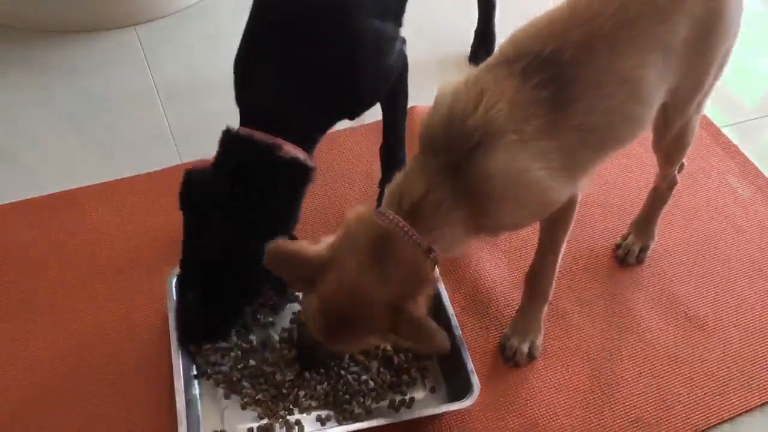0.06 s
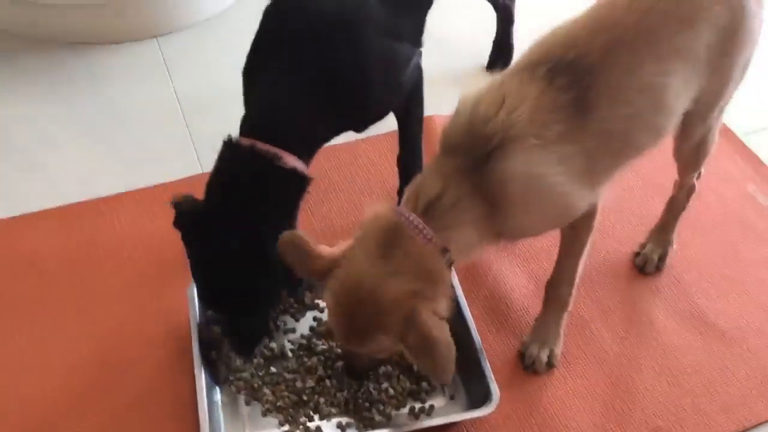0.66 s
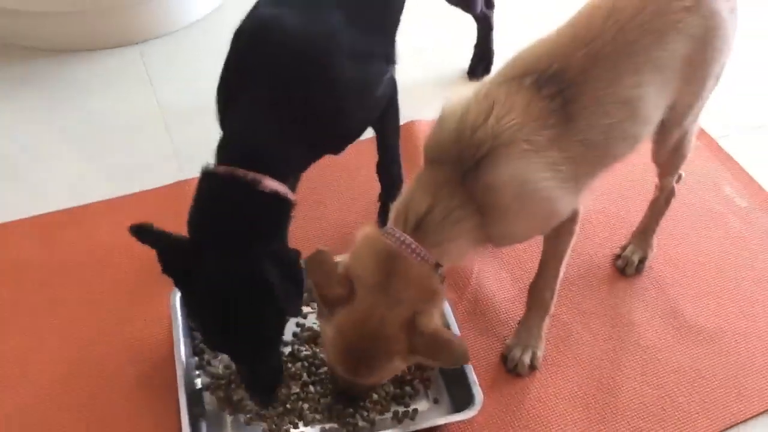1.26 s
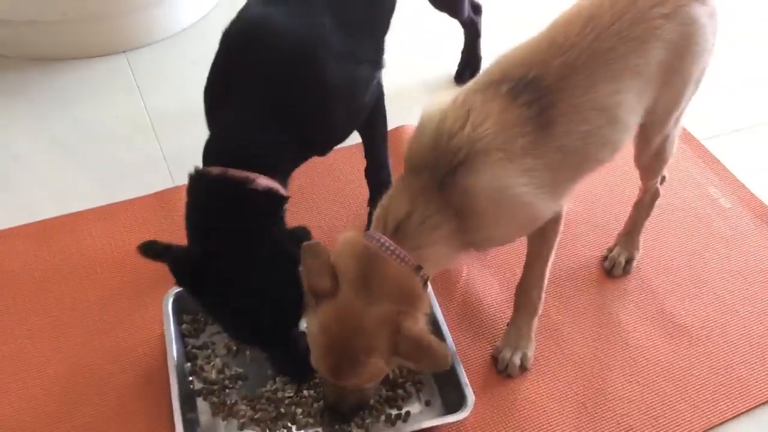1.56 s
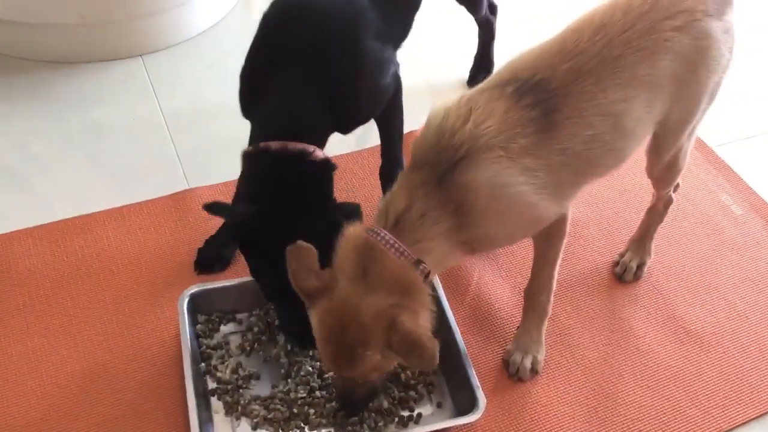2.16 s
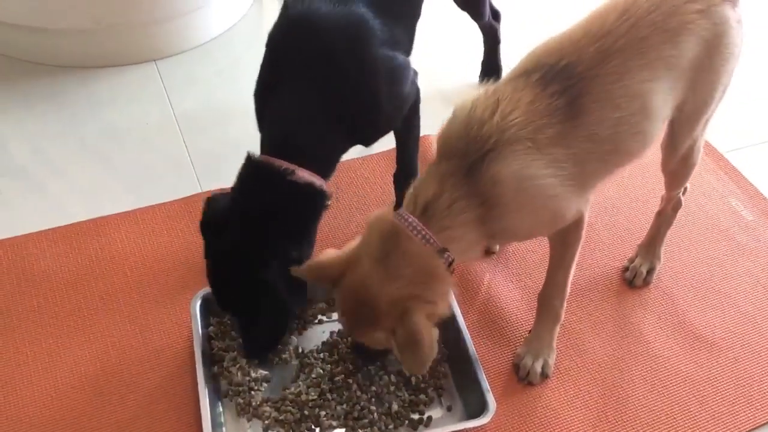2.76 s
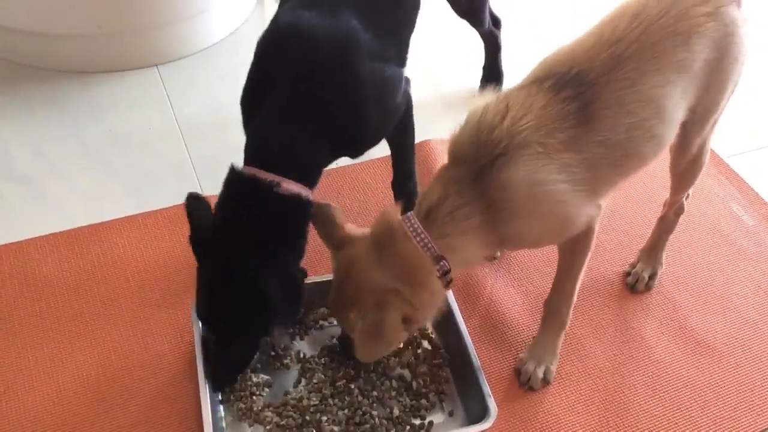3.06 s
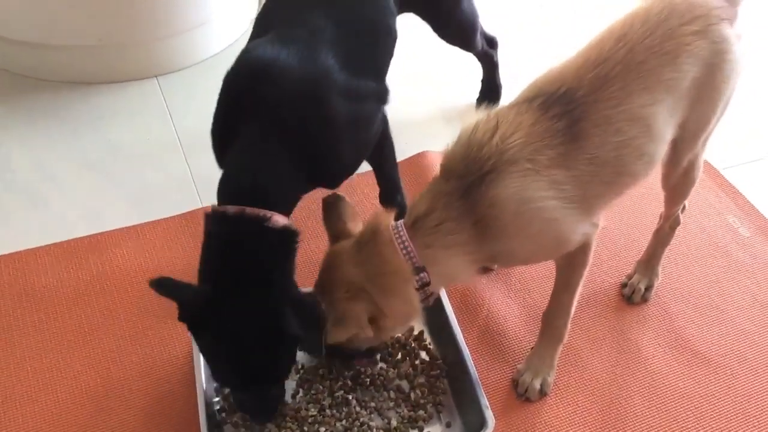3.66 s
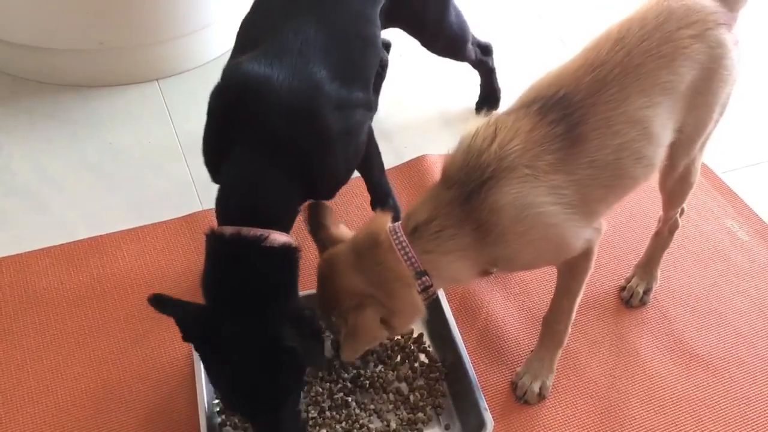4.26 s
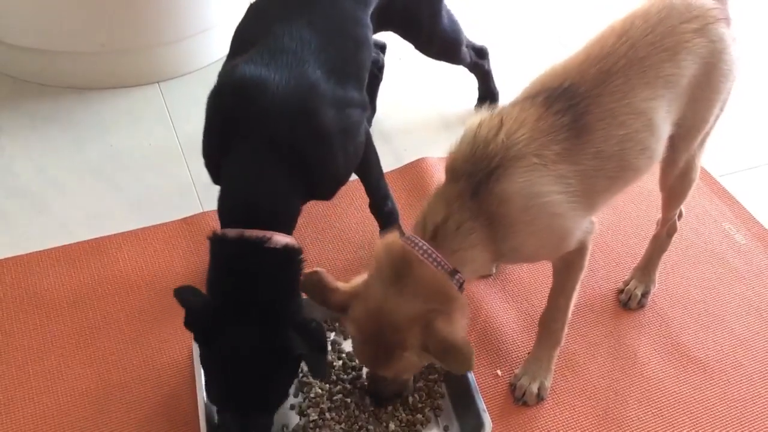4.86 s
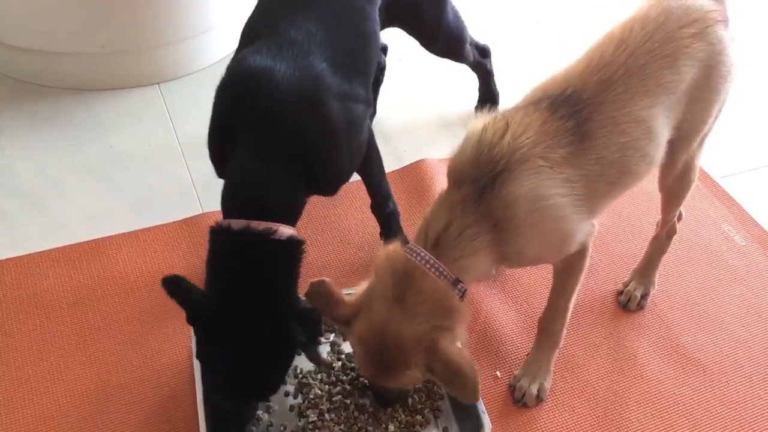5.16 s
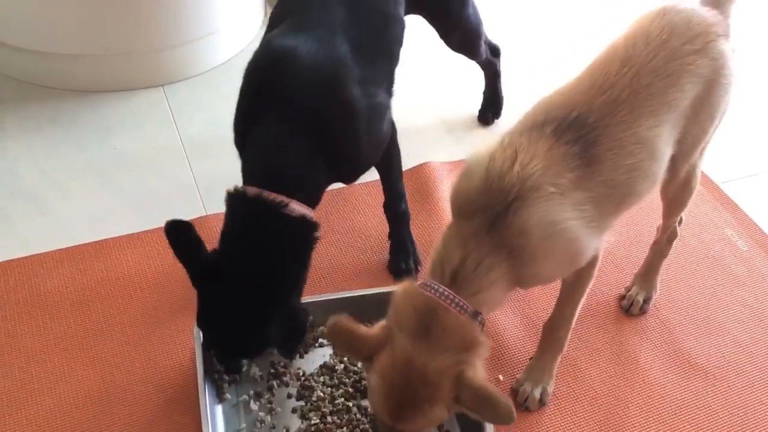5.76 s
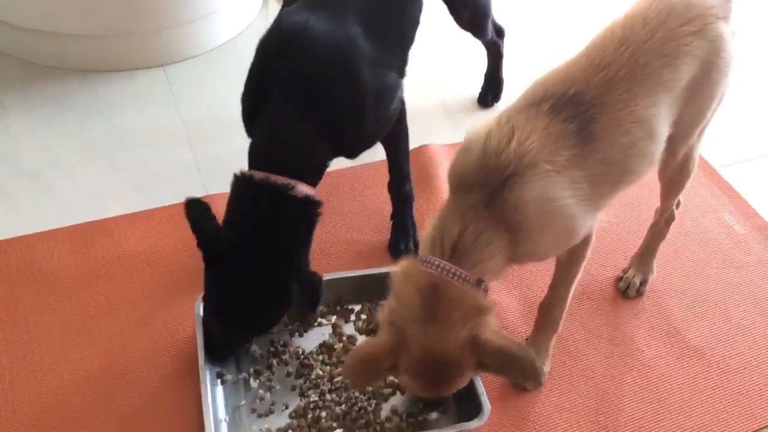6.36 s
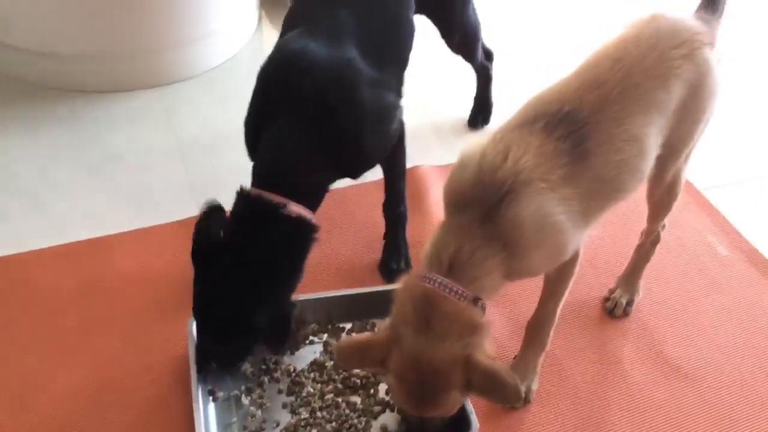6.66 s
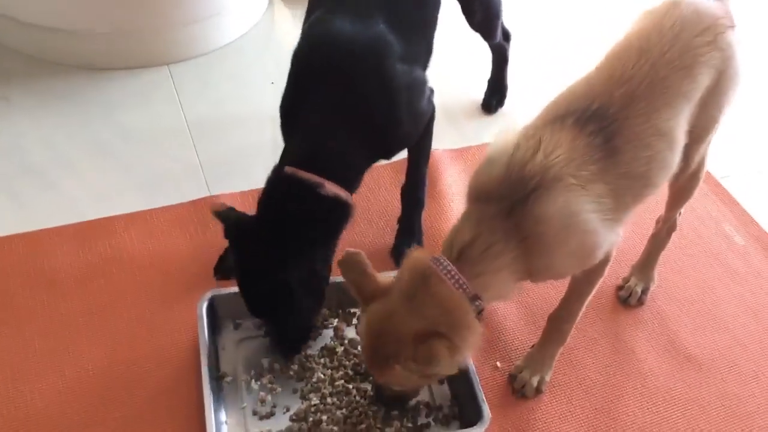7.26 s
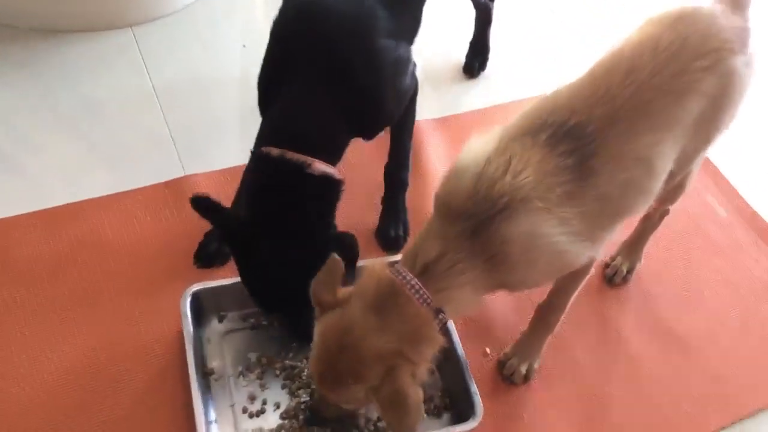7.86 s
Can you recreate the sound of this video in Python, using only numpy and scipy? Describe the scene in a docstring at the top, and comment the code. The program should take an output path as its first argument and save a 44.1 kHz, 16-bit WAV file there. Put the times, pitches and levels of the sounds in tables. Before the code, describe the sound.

A nearby compressor drones low and steady for the whole eight seconds, with electrical hum, a faint thin whine and a fan moving air. From the very start, two dogs eat dry kibble from a metal tray, quieter than the drone: wet tongue clicks, single pellets snapping, short crunches and a faint rustle of loose pellets, all irregularly spaced. A pellet ticks on the tray at 0.8 seconds, the tray bumps dully on its mat at 1.8, and a quick cluster of clinks follows at 2.2. The strongest crunch comes at 3.2 seconds, together with more clinks. Soft low tray bumps occur around 4.1 and 4.7 seconds amid further cracks. The eating thins near 6 seconds, where two very faint thin squeaks sound. A sharp wet click at 6.9 seconds leads into more light crunching until the end. The tiled room gives the eating a short echo.

```python
"""A low, steady drone comes first, and almost at once the wet clicks of two dogs eating.
The drone is a nearby compressor, with electrical hum, a thin whine and a fan moving air.
The dogs take dry kibble from a metal tray that bumps on its mat and clinks when a pellet hits it.
Tongues click, single pellets snap, and mouthfuls crunch in short showers of tiny cracks.
The tiled room gives the eating a short echo."""
import sys
import numpy as np
from scipy import signal
from scipy.fft import rfft, irfft, next_fast_len
from scipy.io import wavfile

SR = 44100
rng = np.random.default_rng(int(sys.argv[2]) if len(sys.argv) > 2 else 0)


def log_audio(samples):
    """Write samples as a 16-bit WAV file to the path given in sys.argv[1]."""
    # one column per channel
    frames = np.atleast_2d(samples).T
    # limit to full scale, then quantise
    limited = np.clip(frames, -1, 1)
    pcm = np.round(limited * 32767).astype(np.int16)
    wavfile.write(sys.argv[1], SR, pcm)


N = 353241

SHAFT_HZ, MAINS_HZ, FAN_HZ = 58.24, 60.03, 52.63
# Levels in the tables are relative; t is the start of a sound or a point on a curve.
# compressor tones: multiple of the shaft speed; level/dB
SHAFT_MULTIPLES = [1, 3, 4, 34, 35, 47, 49, 50, 51, 56, 60, 61, 62, 70, 71, 72, 74, 76, 81, 82, 87, 97]
SHAFT_LEVELS = [-61, -33.3, -52, -83, -85, -89, -86, -86, -84, -81.5, -88, -87, -86, -89, -88, -83, -85.5,
                -79.5, -85, -84, -87, -88]
# electrical hum: multiple of the mains frequency; level/dB
HUM_MULTIPLES = [2, 4, 6]
HUM_LEVELS = [-48, -53, -65.5]
# tones of the rotor's slots: mains multiple (before twice the shaft speed is taken off); level/dB
SLOT_MULTIPLES = [12, 14, 16, 18]
SLOT_LEVELS = [-73.5, -72.5, -67.5, -72]
# fan tones: multiple of the fan speed; level/dB
FAN_MULTIPLES = [2, 4, 6, 8, 12]
FAN_LEVELS = [-50, -60, -64.5, -71.5, -76]
# pitches at which the casing rings: f/Hz, width/Hz, level/dB
CASING_RINGS = [(167.9, 26.6, -45), (256.6, 17, -54.5), (356, 34, -61)]
# moving air, low rumble and high hiss: f/Hz, level/dB per Hz
AIR_RUMBLE = [(15, -81.5), (35, -85.5), (56, -69), (80, -72.5), (110, -60), (138, -68), (180, -69.5),
              (203, -80.5), (238, -66.5), (285, -76), (400, -79.5), (460, -87.5), (700, -110)]
AIR_HISS = [(300, -100), (480, -89), (660, -85), (950, -89.5), (1500, -92), (2050, -94), (2800, -97),
            (3500, -99), (3900, -102), (4900, -101), (5600, -106), (7700, -108), (9300, -110)]
# slow change of the deepest rumble: t/s, gain/dB
DEEP_RUMBLE_GAIN = [(0, 0.5), (3, 0), (5, 0.5), (8, -6)]
# dull bumps of the tray on the mat: t/s, length/s, level/dB, f/Hz
TRAY_BUMPS = [(1.421, .04, -57, 650), (1.679, .05, -58.5, 700), (1.832, 0.1, -44, 229),
              (1.848, 0.08, -54.5, 600), (3.195, 0.0095, -46, 750), (3.594, .03, -54, 780),
              (4.078, .14, -49, 80.6), (4.658, .22, -49, 78.6), (4.844, .022, -47, 370),
              (4.854, 0.012, -53, 700), (7.18, .19, -59, 760)]
# faint thin squeaks: t/s, length/s, starting f/Hz, glide/(Hz per s), level/dB
THIN_SQUEAKS = [(5.937, 0.085, 1830, 1050, -63), (6.031, 0.105, 1965, -550, -61.5)]
# tones of the damped tray: multiple of the struck pitch, time to fade by 60 dB/s, level/dB
TRAY_RINGS = [(0.78, .02, -13), (1, .03, -1), (1.72, .02, -16), (2.17, .02, -18)]
# pellets touching the bare tray: t/s, peak level/dB, f/Hz of the struck spot
TRAY_CLINKS = [(0.7955, -47.5, 2000), (2.186, -50, 1790), (2.193, -46, 1900), (2.199, -47, 1350),
               (2.2035, -39.5, 2050), (2.209, -42, 1870), (2.2155, -42.5, 1980), (2.227, -47, 1960),
               (3.185, -44, 2100), (3.1965, -34.5, 2085), (3.1994, -42.5, 1100), (3.2055, -39, 1795),
               (3.21, -40, 2460), (3.2205, -41.5, 2050)]
# pellets grinding on teeth and on each other: t/s, length/s, level/dB, f/Hz, width/octaves
PELLET_GRINDS = [(0.358, .032, -61.5, 3200, .3), (1.045, 0.025, -63, 8250, 0.11),
                 (1.088, .016, -64, 3480, .1), (1.841, .03, -56, 1600, .7), (1.876, .055, -65, 3870, 0.3),
                 (3.191, 0.033, -55, 2100, .35), (3.193, .016, -51, 1230, 0.65),
                 (3.2, 0.018, -55, 2960, .3), (3.193, 0.028, -53, 5170, 0.28),
                 (3.191, 0.021, -52, 8700, 0.24), (3.585, 0.024, -59.5, 8200, .2),
                 (4.866, 0.023, -61, 4800, 0.54), (4.865, .024, -61, 2760, 0.46)]
# wet clicks of tongue or lips: t/s, peak level/dB, starting f/Hz
TONGUE_CLICKS = [(0.029, -49, 2100), (0.063, -44, 2000), (0.345, -48, 2100), (0.797, -47, 2400),
                 (1.0228, -46, 2720), (1.861, -44, 1750), (2.787, -45, 2100), (3.193, -41, 1640),
                 (3.2013, -43, 2240), (3.621, -43.5, 1900), (5.02, -46.5, 2440), (5.251, -49, 3000),
                 (5.2995, -46, 2700), (5.408, -42, 1800), (6.902, -37.5, 2130), (7.342, -49, 2400),
                 (7.638, -50, 1900)]
# the low, body, crack and fizz bands of a crunch: lowest f/Hz, highest f/Hz
CRUNCH_BANDS = [(500, 1200), (1200, 2400), (2600, 5500), (5500, 9300)]
# mouthfuls crushed or pushed about: t/s, length/s, level/dB, treble tilt/(dB per octave)
MOUTHFULS = [(0.024, 0.022, -59, -2.5), (0.14, 0.018, -65.5, -4), (0.338, 0.017, -61.5, -4.5),
             (0.363, 0.035, -65.5, -5.5), (1.04, 0.028, -59.5, 1.5), (1.07, .025, -65, -1),
             (1.368, 0.15, -68, -0.5), (1.84, 0.06, -61.5, -6), (1.912, 0.035, -63.5, -4.5),
             (2.6, .033, -67, -6), (2.954, 0.0081, -56.5, 0.5), (3.11, 0.058, -68, 3),
             (3.187, 0.032, -52, -1), (3.245, 0.079, -65, 0), (3.578, 0.033, -56, 2),
             (4.032, .019, -65, -6), (4.319, 0.022, -63.5, -6), (4.422, 0.044, -61.5, 1.5),
             (4.857, 0.028, -57.5, 1), (4.895, 0.012, -64, -5), (5.294, 0.013, -62, -5.5),
             (5.398, 0.026, -62.5, -6.5), (7.04, .025, -66, -4), (7.184, 0.017, -70, 7),
             (7.299, 0.012, -66, -1), (7.318, 0.032, -63.5, -4), (7.97, 0.042, -62, -4.5)]
# single pellets snapping: t/s, level/dB, f/Hz, width/octaves
PELLET_SNAPS = [(0.146, -57.5, 4600, 0.55), (0.161, -61, 4700, 0.46), (0.279, -62, 7550, .5),
                (0.417, -63, 8550, .25), (0.509, -56, 6200, 0.71), (0.752, -62, 5400, .5),
                (1.051, -55, 4600, 1), (1.0625, -57, 7200, .6), (1.067, -58, 3900, .5),
                (1.378, -60, 6000, 1), (1.434, -56, 2400, 1.2), (1.693, -51.5, 5400, 0.51),
                (1.846, -52, 855, 0.64), (1.8635, -54.5, 8400, .25), (1.863, -56, 5900, .25),
                (1.865, -55, 2750, 0.43), (1.88, -54.5, 1200, .4), (2.746, -58, 7150, .7),
                (2.772, -63, 6800, .8), (3.163, -44.5, 5800, 1.4), (3.1635, -53, 1150, .8),
                (3.1913, -50.5, 3400, 0.28), (3.196, -47, 6200, 1.0), (3.587, -54, 4700, 1.6),
                (3.652, -59, 7600, 0.45), (4.41, -55.5, 6400, .9), (4.454, -53, 7500, .6),
                (4.857, -55, 7240, .6), (4.872, -55, 4200, .8), (4.888, -58, 4700, 0.54),
                (5.025, -61, 3400, .7), (5.528, -61, 7800, 0.59), (6.275, -64, 6800, .7),
                (6.903, -54.5, 6260, 0.66), (7.024, -57.5, 5200, 1.0), (7.068, -61, 7000, .7),
                (7.654, -59, 3750, 0.95)]
# the microphone's uneven treble: f/Hz, gain/dB
MICROPHONE_GAIN = [(0, 0), (5000, -3), (5500, -3.5), (6200, -3), (6750, -1.5), (7300, -4), (7750, -4.5),
                   (8400, -1), (9200, -6)]


def amp(db):
    """Turns decibels into a gain."""
    return 10 ** (np.asarray(db) / 20)


def unit(x):
    """Scales a signal to an average size (rms) of 1."""
    return x / np.sqrt(np.mean(x ** 2) + 1e-20)


def band(x, edges):
    """Keeps the frequencies between two edges, given in Hz."""
    return signal.sosfilt(signal.butter(3, edges, "bandpass", fs=SR, output="sos"), x)


def around(hz, octaves):
    """Band edges to either side of a pitch."""
    return np.clip(hz * 2 ** (octaves * np.array([-.5, .5])), 20, SR / 2 - 100)


def add(mix, start_s, sound):
    """Mixes a sound in at its start time."""
    part = mix[max(round(start_s * SR), 0):][:len(sound)]
    part += sound[:len(part)]


def noise(gain):
    """Steady noise shaped by gain(Hz); gain 1 is 0 dB per Hz."""
    size = next_fast_len(N)
    hz = np.fft.rfftfreq(size, 1 / SR)
    return irfft(rfft(rng.standard_normal(size)) * gain(hz), size)[:N] * np.sqrt(SR / 2)


def coloured(points):
    """Noise that follows a table of f/Hz, level/dB per Hz."""
    f, db = np.transpose(points)
    return noise(lambda hz: amp(np.interp(np.log(hz + 1), np.log(f), db)))


def drift(per_s):
    """A random wander of rms 1, with per_s new values a second."""
    knots = rng.standard_normal(int(N / SR * per_s) + 4)
    return unit(np.interp(np.arange(N) / SR * per_s, np.arange(len(knots)), knots))


def tones(freqs, levels_db, waver_db, slip_turns, per_s=10):
    """Lasting tones, each wavering in level and slipping a little ahead or behind."""
    t, out = np.arange(N) / SR, np.zeros(N)
    for hz, db in zip(freqs, levels_db):
        turns = hz * t + rng.random() + slip_turns * drift(2)
        level = amp(db + waver_db * np.minimum(drift(per_s), 1.4))
        out += np.sqrt(2) * level * np.sin(2 * np.pi * turns)
    return out


def stroke(length_s, rise_share=0.37, release_share=0.77):
    """The force of one bite or push: it builds up, then lets go."""
    progress = np.arange(SR * 2 // 3) / SR / length_s
    release = np.exp(-(np.maximum(progress - rise_share, 0) / release_share) ** 2)
    return np.sqrt(np.minimum(progress / rise_share, 1)) * release


def early_echoes(x, strength, count=12):
    """Echoes off the tray walls and floor come within 4 ms and colour each bite differently."""
    taps = np.zeros(SR // 250)
    taps[rng.integers(30, len(taps), count)] = strength * rng.choice([-1, 1], count)
    taps[0] = 1
    return np.convolve(x, taps)[:len(x)]


def crack_shower(envelope, levels_db, bands, span_s, grains_per_s, grit, echo):
    """Tiny cracks mixed with noise; each band has its level over the first span_s."""
    count, out = len(envelope), 0
    for db, edges in zip(levels_db, bands):
        grains = rng.standard_normal(count) * (rng.random(count) < grains_per_s / SR)
        cracks = envelope * (grit * unit(grains) + rng.standard_normal(count))
        sound = band(early_echoes(cracks, echo), edges)
        out = out + amp(db) * sound / np.std(sound[:int(span_s * SR)])
    return out


def air_stream(flutter_db=1.3, gust_db=2.5, buffet_db=1.6):
    """The fan moves air: a gusty rumble under a nearly even hiss."""
    rumble = coloured(AIR_RUMBLE)
    deep = signal.sosfiltfilt(signal.butter(2, 100, fs=SR, output="sos"), rumble)  # below 100 Hz
    slow_db = np.interp(np.arange(N) / SR, *np.transpose(DEEP_RUMBLE_GAIN))
    gusts = amp(slow_db + gust_db * np.minimum(drift(7.4), 1) + buffet_db * drift(22))
    hiss = coloured(AIR_HISS) * amp(flutter_db * drift(18))
    return rumble - deep + deep * gusts + hiss


def fan():
    """The fan hums at multiples of its turning speed."""
    return tones(FAN_HZ * np.array(FAN_MULTIPLES), FAN_LEVELS, waver_db=2, slip_turns=0.022)


def motor_hum():
    """Mains power hums, and the slots in the spinning rotor sing above it."""
    hum = tones(MAINS_HZ * np.array(HUM_MULTIPLES), HUM_LEVELS, waver_db=2, slip_turns=0.015)
    slot_hz = MAINS_HZ * np.array(SLOT_MULTIPLES) - 2 * SHAFT_HZ
    return hum + tones(slot_hz, SLOT_LEVELS, waver_db=1, slip_turns=0.064)


def casing():
    """The machine shakes its casing, which rumbles around a few low pitches."""
    return sum(amp(db) * unit(noise(lambda f: 1 / (1 + ((f - hz) / width * 2) ** 2)))
               for hz, width, db in CASING_RINGS)


def compressor():
    """The turning shaft makes a low drone of three tones and a thin, flickering whine."""
    hz = SHAFT_HZ * np.array(SHAFT_MULTIPLES)
    drone = tones(hz[:3], SHAFT_LEVELS[:3], waver_db=0, slip_turns=0.0077)
    slow_swell = amp(np.linspace(-.7, .6, N))
    whine = tones(hz[3:], SHAFT_LEVELS[3:], waver_db=5.5, slip_turns=0.13, per_s=49)
    return drone * slow_swell + amp(1.5) * whine


def room(x, fade_s=0.19, echo_db=-5.5, delay_s=0.0041):
    """The tiled room adds a soft echo that falls by 60 dB in fade_s."""
    t = np.arange(SR // 2) / SR
    tail = rng.standard_normal(len(t)) * np.exp(-np.log(1000) * t / fade_s) * (t > delay_s)
    return x + amp(echo_db) * signal.oaconvolve(x, tail / np.linalg.norm(tail))[:N]


def tray_bumps(width=0.28):
    """The pushed tray rubs and knocks on the mat: a soft, low shudder."""
    out = np.zeros(N)
    for start, length, db, hz in TRAY_BUMPS:
        push = stroke(length)
        edges = hz * np.exp([-width, width])
        shudder = band(rng.standard_normal(SR), edges)[-len(push):]
        add(out, start, amp(db) * push * unit(shudder))
    return out


def squeaks(wobble=0.0046):
    """Thin gliding tones that swell and fade."""
    out = np.zeros(N)
    for start, length, hz, glide, db in THIN_SQUEAKS:
        t = np.arange(0, length, 1 / SR)
        pitch = (hz + glide * t) * (1 + wobble * drift(150)[:len(t)])
        envelope = np.sqrt(2 * np.sin(np.pi * t / length))
        add(out, start, amp(db) * envelope * np.sin(2 * np.pi * np.cumsum(pitch) / SR))
    return out


def loose_kibble(per_s=90, spread_db=4, level_db=-71, tilt_db=-3.5, ring_s=0.0003, pitches=24):
    """Muzzles nudge loose pellets, which rustle in fits: tiny taps at many pitches."""
    out, t = np.zeros(N), np.arange(SR // 100) / SR
    for hz in np.geomspace(1300, 8500, pitches):
        sizes = amp(spread_db * np.minimum(rng.exponential(1, N), 2))
        hits = sizes * (rng.random(N) < per_s / pitches / SR)
        tap = band(rng.standard_normal(len(t)) * np.exp(-t / ring_s), (hz * 3 / 4, hz * 4 / 3))
        out += amp(tilt_db * np.log2(hz)) * signal.oaconvolve(hits, unit(tap))[:N]
    nudges_db = 2 * np.minimum(drift(per_s=12), 1)
    return amp(level_db) * unit(out * amp(nudges_db))


def tray_clinks(rise_s=0.0016):
    """A pellet skips or presses on the tray; each spot rings briefly at its own pitch."""
    out, t = np.zeros(N), np.arange(SR // 20) / SR
    for start, db, hz in TRAY_CLINKS:
        ring = sum(amp(tone_db - 60 * t / fade_s) * np.sin(2 * np.pi * multiple * hz * t)
                   for multiple, fade_s, tone_db in TRAY_RINGS)
        ring *= np.minimum(t / rise_s, 1)
        add(out, start, amp(db) * ring / abs(ring).max())
    return out


def grinds():
    """Hard pellets rub: a quick run of tiny slips rings in one narrow band."""
    out = np.zeros(N)
    for start, length, db, hz, width in PELLET_GRINDS:
        add(out, start, crack_shower(stroke(length), [db], [around(hz, width)],
                                     span_s=length, grains_per_s=700, grit=1.2, echo=0.11))
    return out


def tongue_clicks(length_s=0.0034, fall_octaves=1):
    """A small wet pocket pops open, and its pitch falls as it widens."""
    out, progress = np.zeros(N), np.linspace(0, 1, int(length_s * SR))
    envelope = np.sin(np.pi * np.sqrt(progress)) ** 2
    for start, db, hz in TONGUE_CLICKS:
        turns = np.cumsum(hz * 2 ** (-fall_octaves * progress)) / SR
        add(out, start, amp(db) * envelope * np.sin(2 * np.pi * turns))
    return out


def faint_snaps(per_s=2.2, level_db=-68, low_hz=3000, high_hz=7500, octaves=1):
    """Soft chewing ticks at random times and pitches, as rows like those of PELLET_SNAPS."""
    draws = rng.random((round(per_s * N / SR), 2))
    return [(when * N / SR, level_db, low_hz * (high_hz / low_hz) ** height, octaves)
            for when, height in draws]


def snaps(rise_s=0.0014, decay_s=0.0013, gain_db=2.5, broad_db=-10.5, broad_hz=(1500, 8500)):
    """A pellet breaks in a few milliseconds: a crack in its own band over a weaker, broad snap."""
    out, t = np.zeros(N), np.arange(SR // 50) / SR
    envelope = np.minimum(t / rise_s, 1) * np.exp(-np.maximum(t - rise_s, 0) / decay_s)
    for start, db, hz, width in PELLET_SNAPS + faint_snaps():
        add(out, start, crack_shower(envelope, [db, db + broad_db], [around(hz, width), broad_hz],
                                     span_s=0.0032, grains_per_s=4100, grit=0.3, echo=0.17))
    return amp(gain_db) * out


def crunches(middle_hz=2480, droop_db=-1.55):
    """Cracks pile up as the jaw closes: crisp in the front teeth, dull in a closed mouth."""
    out = np.zeros(N)
    octaves = np.log2(np.array(CRUNCH_BANDS) / middle_hz).mean(1)  # each band's height above the middle
    for start, length, db, tilt in MOUTHFULS:
        levels_db = db + tilt * octaves + droop_db * octaves ** 2
        add(out, start, crack_shower(stroke(length), levels_db, CRUNCH_BANDS,
                                     span_s=length, grains_per_s=600, grit=2.2, echo=0.36))
    return out


def scene():
    """The eating and its echo, over the machine and its air stream, in one channel."""
    eating = snaps() + tongue_clicks() + crunches() + grinds() + tray_clinks() + loose_kibble()
    dogs = room(eating + squeaks()) + tray_bumps()
    background = compressor() + motor_hum() + fan() + casing() + air_stream()
    return (dogs + background)[None]


def record(dry, cut_hz=9180):
    """The microphone colours the treble, then a steep filter removes what lies above cut_hz."""
    hz = np.fft.rfftfreq(N, 1 / SR)
    heard = irfft(rfft(dry) * amp(np.interp(hz, *np.transpose(MICROPHONE_GAIN))), N)
    low_pass = signal.firwin(401, cut_hz, window=("kaiser", 8), fs=SR)
    return signal.oaconvolve(heard, low_pass[None], "same")


dry = scene()
out = record(dry)
log_audio(out)
```